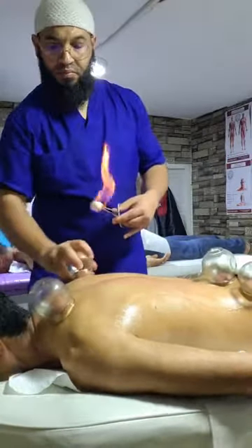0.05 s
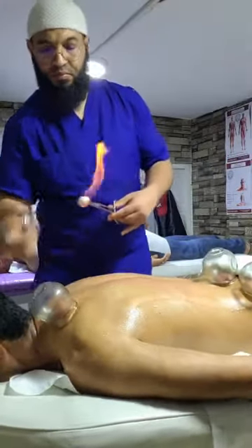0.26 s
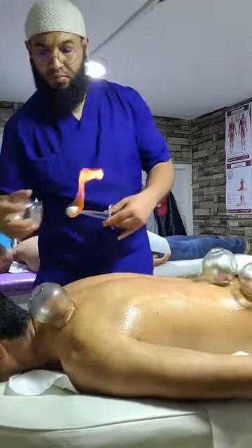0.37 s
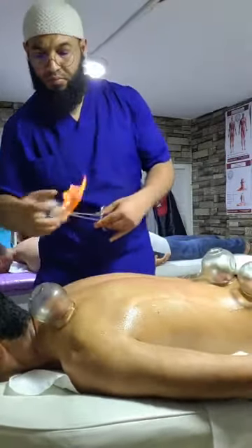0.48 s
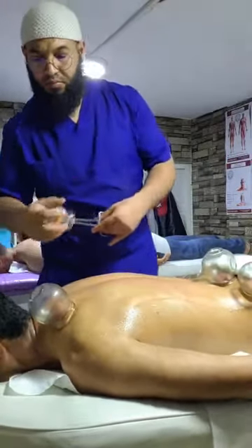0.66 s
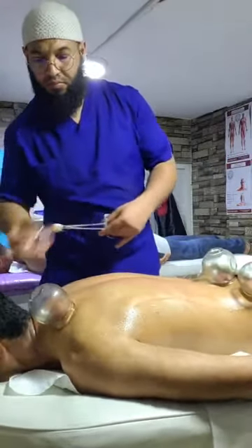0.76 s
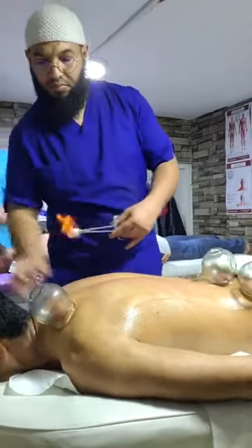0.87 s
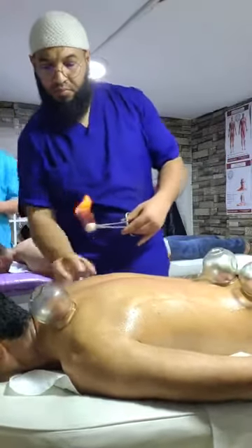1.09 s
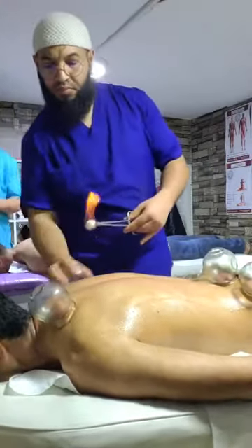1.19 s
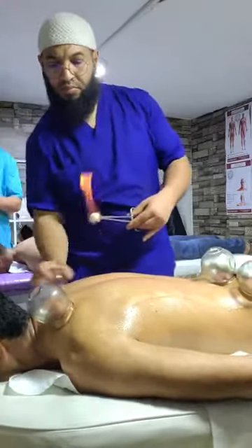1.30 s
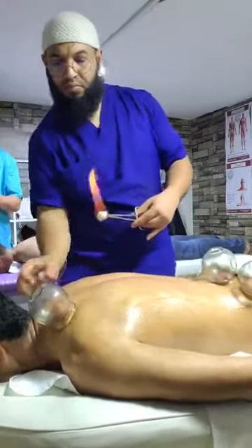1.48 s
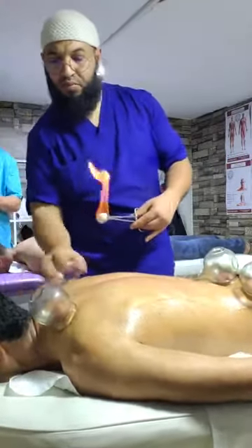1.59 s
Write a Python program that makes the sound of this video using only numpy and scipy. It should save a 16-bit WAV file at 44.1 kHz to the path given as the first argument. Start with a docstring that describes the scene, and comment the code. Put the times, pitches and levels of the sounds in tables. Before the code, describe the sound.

Hollow, rising pop of a glass cup pulled from skin, then a faint glass clink

```python
"""Small room, stereo microphone close by, its right port nearer: a glass cup is pulled off skin.
Noise hisses at the rim, then a sine climbs as the cavity opens; shaken glass and freed skin ring as decaying modes.
Tongs tick the glass, narrow noise puffs as flame in the cup, and damped modes thud as it lands on the back.
Sticky clicks and rustles of hand and cloth are noise swells, over a wavering low rumble and faint hiss."""
import sys
import numpy as np
from scipy import signal
from scipy.fft import rfft, irfft
from scipy.io import wavfile
from scipy.ndimage import uniform_filter1d

SR = 44100
rng = np.random.default_rng(int(sys.argv[2]) if len(sys.argv) > 2 else 0)


def volts(x):
    """Linear amplitude factor 10**(x/20) for a level x in dB, scalar or array-like."""
    e = np.asarray(x, float) / 20
    return 10 ** e


def dump_mix(stems):
    """Bounce the given channels to the path in sys.argv[1] as a 16-bit WAV at rate SR."""
    frames = np.atleast_2d(stems).T  # one column per channel
    limited = np.clip(frames, -1, 1)  # hard clip at full scale
    pcm = np.round(limited * 32767).astype(np.int16)
    wavfile.write(sys.argv[1], SR, pcm)


N = 72765
T = np.arange(N) / SR
F = np.maximum(np.fft.rfftfreq(N, 1 / SR), 1)

# Course of the low rumble: [t/s, level/dB]
RUMBLE_COURSE = [(0, -51.5), (.15, -46.5), (.3, -39.5), (0.441, -49.5), (0.498, -65), (.62, -45.5),
                 (.7, -52.5), (.77, -68), (0.809, -51.5), (.865, -69), (0.924, -46.5), (.965, -55.5),
                 (1.038, -42.5), (1.13, -62), (1.18, -51.5), (1.242, -73.5), (1.289, -49.5), (1.347, -71.5),
                 (1.531, -45.5), (1.575, -56), (1.619, -49), (1.65, -62)]
# Spectrum of the faint background hiss: [f/Hz, relative level per Hz/dB]
FLOOR_SPECTRUM = [(59, -25), (100, -4.5), (415, -24), (583, -17), (1390, -34.5), (2630, -36), (4470, -40.5),
                  (8110, -28.5), (16000, -58.5)]
# Rustles of hand and cloth: [peak t/s, rise/s, fall/s, level/dB, low edge f/Hz, top f/Hz]
RUSTLE_EVENTS = [(.05, 0.046, 0.09, -57.5, 118, 500), (0.122, 0.093, 0.18, -59.5, 650, 6050),
                 (.175, 0.012, 0.027, -46.5, 1180, 9000), (0.441, 0.031, 0.034, -44.5, 350, 2500),
                 (0.588, .015, 0.021, -70.5, 3100, 9000), (.92, 0.021, 0.034, -69, 297, 450),
                 (1.302, 0.15, 0.073, -74, 1200, 5000), (1.471, 0.091, 0.13, -54, 1190, 4250),
                 (1.55, 0.046, 0.075, -70, 252, 490), (0.142, 0.032, 0.047, -57.5, 301, 596.5)]
# Short clicks, mostly small and sticky; the one at 0.1953 s is the sharp start of the breaking seal: [t/s,
# level/dB, low edge f/Hz]
CLICK_EVENTS = [(0.0538, -54, 2500), (.157, -39, 2500), (0.1953, -33.5, 400), (.398, -58, 2080),
                (0.5642, -58.5, 3030), (1.4521, -43, 2930)]
# Soft landings on the back: [t/s, level/dB, push/s]
THUD_EVENTS = [(0.9972, -28.5, 0.0023), (1.097, -52.5, 0.0036)]
# Modes of the flesh under a landing: [f/Hz, relative level/dB, t60/s]
FLESH_MODES = [(184, -1, .05), (254.6, 3.5, 0.028), (450, -11.5, 0.042)]
# Modes of the glass ticked by the tongs: [f/Hz, relative level/dB, t60/s]
TICK_MODES = [(6740, -22, 0.015), (7074, -27, 0.039), (7197, -18, 0.088), (7361, 2.5, 0.063),
              (7600, -9, 0.049)]
# Spectrum of air through the breaking seal: [f/Hz, relative level per Hz/dB]
SEAL_SPECTRUM = [(88, -41.5), (150, -9), (414, -22), (689, -18.5), (1120, -28.5), (1940, -33.5),
                 (2450, -22), (3220, -41.5), (3420, -30), (7320, -23), (16000, -36.5)]
# Modes of the cup as it is shaken loose: [f/Hz, relative level/dB, t60/s]
CUP_MODES = [(1350, -14, .02), (2500, -6, 0.022), (3536, -5.5, 0.041), (5317, 3, 0.055), (5889, -5.5, .08),
             (6900, -2.5, 0.056), (7133, 0, 0.049), (7264, -2.5, .04), (9200, -5, .03), (11100, -12, .03),
             (11700, -17.5, 0.026)]
# Modes of the freed skin springing back: [f/Hz, relative level/dB, t60/s]
SKIN_MODES = [(70, -5, 0.094), (130, 1, 0.033), (200, 2.5, .04)]
# Early echoes off the room: [delay t/s, left level/dB, right level/dB]
EARLY_ECHOES = [(.009, -23.5, -13.5), (.0135, -23.5, 4), (.0235, -2, -8.5), (.042, -5, -15.5),
                (.05, -13.5, -6)]
# Diffuse tail of the room: [f/Hz, t60/s, relative level/dB, likeness of left and right/0-1]
TAIL_BANDS = [(69.74, 0.44, -4, 0.94), (205.1, 0.61, 0, 0.92), (356.7, 0.62, -6, 0.43),
              (650, 0.27, 5.5, 0.1), (1500, 0.42, -1, 0), (5000, 0.27, 0.5, 0), (9000, 0.22, 3, .4),
              (15000, 0.12, -1, 0.2)]
# Low standing waves of the room: [f/Hz, level/dB, t60/s]
STANDING_WAVES = [(73.4, -55, 1), (151, -65.5, 0.58), (221.7, -53, 0.7)]


def level(x, db):
    """Scale to an rms level in dB."""
    return x * volts(db) / np.sqrt(np.mean(x ** 2))


def shaped_noise(gain, channels=1):
    """Noise of rms 1 whose spectrum follows a gain over frequency."""
    white = rfft(rng.standard_normal((channels, N)))
    return level(irfft(white * gain, N), 0)


def colour(table, channels=1):
    """Noise of rms 1 through spectrum points, joined on a log frequency axis."""
    hz, db = np.array(table, float).T
    return shaped_noise(volts(np.interp(np.log(F), np.log(hz), db)), channels)


def band(low_hz, top_hz, channels=1):
    """Noise of rms 1, steep under the low edge and gently duller over the top."""
    loss = (1 + (low_hz / F) ** 8) * (1 + (F / top_hz) ** 3.43)
    return shaped_noise(1 / np.sqrt(loss), channels)


def peak(hz, width_hz):
    """Noise of rms 1 gathered around one frequency."""
    return shaped_noise(1 / (1 + ((F - hz) / width_hz) ** 2))[0]


def swell(at, rise, fall, hold=0.):
    """Bell-shaped rise to a peak, hold, exponential fall, all in seconds."""
    rising = np.exp(-.5 * ((T - at) / rise) ** 2)
    falling = np.exp(-np.maximum(T - at - hold, 0) / fall)
    return np.where(T < at, rising, falling)


def ring(at, modes, push):
    """Decaying sine modes set ringing by a push of some length in seconds."""
    t = np.maximum(T - at, 0)
    x = 0
    for hz, db, t60 in modes:
        x = x + volts(db) * np.sin(2 * np.pi * hz * t) * np.exp(-np.log(1000) * t / t60)
    return x * (1 - np.exp(-(t / push) ** 2))


def late(x, s):
    """Delay by s seconds as a phase slope over frequency."""
    return irfft(rfft(x) * np.exp(-2j * np.pi * F * s), N)


def floor_hiss():
    """Faint steady noise, independent at the two ports."""
    return volts(-69.5) * colour(FLOOR_SPECTRUM, channels=2)


def rumble():
    """A phase-wandering sine with noise around it and a fading upper band, alike in both ears."""
    drone_hz, wander_rad = 61.5, 1.2
    upper_hz, upper_db, upper_fade_db_per_s = 159, -5, -7
    wavering = np.sin(2 * np.pi * drone_hz * T + wander_rad * peak(0, 3))
    low = level(wavering + 0.51 * peak(drone_hz, 12), 0)
    upper = volts(upper_db + upper_fade_db_per_s * T) * peak(upper_hz, 40)
    s, db = np.array(RUMBLE_COURSE).T
    return (low + upper) * volts(np.interp(T, s, db))


def rustles():
    """Hand and cloth: wide noise swells with a fine random grain in their level."""
    grain_db, wide = 1.2, .9  # rms flutter; share of unlike noise at each port
    out = 0
    for s, rise, fall, db, low_hz, top_hz in RUSTLE_EVENTS:
        n = band(low_hz, top_hz, channels=3)
        flutter = level(uniform_filter1d(rng.standard_normal(N), size=200), 0)
        grain = volts(grain_db * flutter)
        out = out + volts(db) * swell(s, rise, fall) * grain * (n[0] + wide * n[1:])
    return out


def clicks():
    """Short clicks, sticky ones and the sharp start of the breaking seal: very short noise bursts."""
    return sum(volts(db) * band(hz, 9000)[0] * swell(s, .0004, .002) for s, db, hz in CLICK_EVENTS)


def puff():
    """A flame puffs in the cup: noise in a narrow band with a quick rise and slower fall."""
    hz, width_hz, puff_db = 910, 200, -60
    breath = colour([(hz - width_hz, -30), (hz, 0), (hz + width_hz, -30)])[0]
    return volts(puff_db) * breath * swell(.575, rise=0.0023, fall=0.038, hold=0.017)


def thuds():
    """The cup lands softly on the back: each push rings the damped flesh modes."""
    return sum(volts(db) * ring(s, FLESH_MODES, push) for s, db, push in THUD_EVENTS)


def tick():
    """Tongs on glass: a noise crack and one strong high mode among weaker ones."""
    tick_s, ring_db, crack_db = .619, -25, -41
    crack = band(434, 4000)[0] * swell(tick_s, rise=.0003, fall=.008)
    return volts(ring_db) * ring(tick_s, TICK_MODES, push=0.00067) + volts(crack_db) * crack


def seal_hiss():
    """Air through the breaking seal: coloured noise, gated at its start."""
    opened = np.clip((T - .1945) / 0.002, 0, 1)
    return volts(-17) * colour(SEAL_SPECTRUM)[0] * swell(.2035, rise=.005, fall=.005) * opened


def oil_spit():
    """The oil film snaps: a bright, short burst of noise."""
    return volts(-18) * band(6300, 9500)[0] * swell(.2025, rise=0.003, fall=.005)


def cup_ring():
    """The cup shaken loose: a noise burst drives the glass modes by convolution."""
    shake = rng.standard_normal(N) * swell(.2035, rise=.0025, fall=.005)
    response = ring(0, CUP_MODES, push=0.00027)
    return volts(-52) * irfft(rfft(shake) * rfft(response), N)


def cavity_pop():
    """The cavity note climbs as the gap widens, and the freed skin springs back under it."""
    pop_s, pop_db, rise_s, open_s = .2015, -7.5, .004, .007
    start_hz, end_hz = 130, 828.6
    skin_db = -19.5
    t = np.maximum(T - pop_s, 0)
    # cycles of a pitch that nears end_hz exponentially
    turns = end_hz * t - (end_hz - start_hz) * open_s * (1 - np.exp(-t / open_s))
    attack = 1 - np.exp(-t / rise_s)  # zero until the pop
    note = np.sin(2 * np.pi * turns) * attack * swell(pop_s, 1, fall=0.006, hold=0.014)
    return volts(pop_db) * note + volts(skin_db) * ring(pop_s, SKIN_MODES, push=.002)


def diffuse_tail():
    """Spectrum of a decaying noise tail that dies band by band, partly alike left and right."""
    hz, t60, db, alike = np.array(TAIL_BANDS, float).T
    tail = 0
    for k in range(len(hz)):
        decay = np.exp(-np.log(1000) * T / t60[k]) * (1 - np.exp(-T / .012))
        n = rng.standard_normal((3, N)) * decay
        c = np.clip(alike[k], 0, 1)
        both = np.sqrt(c) * n[0] + np.sqrt(1 - c) * n[1:]
        # neighbouring bands crossfade in power on a log frequency axis
        share = np.interp(np.log(F), np.log(hz), np.arange(len(hz)) == k)
        tail = tail + rfft(both) * np.sqrt(share) * volts(db[k]) / np.sqrt(t60[k] * SR / 14)
    return tail


def room(x):
    """Direct sound, a few duller echoes, low standing waves and a diffuse tail."""
    echo_top_hz, tail_db = 2500, 1.5
    echoes = 0
    for s, left_db, right_db in EARLY_ECHOES:
        echoes = echoes + volts(np.array([[left_db], [right_db]])) * np.exp(-2j * np.pi * F * s)
    early = 1 + echoes / (1 + 1j * F / echo_top_hz)
    waves = rfft(ring(0, STANDING_WAVES, push=0.03))
    return irfft(rfft(x) * (early + volts(tail_db) * diffuse_tail() + waves), N)


def pan(db):
    """Left and right gains that differ by db, positive to the left."""
    return volts(np.array([[db / 2], [-db / 2]]))


def ports(near):
    """The farther left port hears later; the bass reaches both ports alike."""
    left_lag_s, alike_under_hz = .0003, 168.1
    spectra = rfft(np.array([late(near[0], left_lag_s), near[1]]))
    middle = spectra.mean(axis=0)
    return irfft(middle + (spectra - middle) / (1 + (alike_under_hz / F) ** 4), N)


def scene():
    """Near events pass through the room to both ports, over rustles, rumble and hiss."""
    background = floor_hiss() + rumble() + rustles()
    pull = seal_hiss() + oil_spit() + cup_ring() + cavity_pop()
    near = room(clicks() + puff() + thuds() + pull) * pan(-0.5) + room(tick()) * pan(-4)
    return background + ports(near)


def band_limit(x):
    """A steep low-pass at the top of the band."""
    return signal.sosfilt(signal.butter(12, 16300, fs=SR, output="sos"), x)


def record(dry):
    """The microphone has a narrow dip in the treble."""
    dip_hz, dip_width_hz, dip_db = 9580, 470, -7.5
    dip = volts(dip_db * np.exp(-.5 * ((F - dip_hz) / dip_width_hz) ** 2))
    mix = irfft(rfft(dry) * dip, N)
    return band_limit(mix)


dry = scene()
out = record(dry)
dump_mix(out)
```